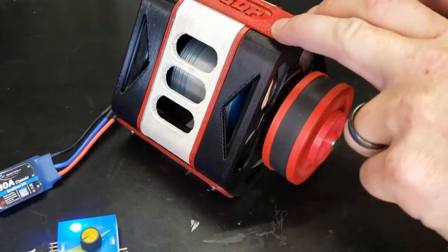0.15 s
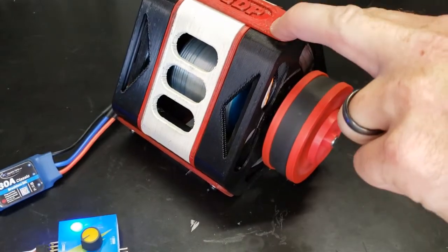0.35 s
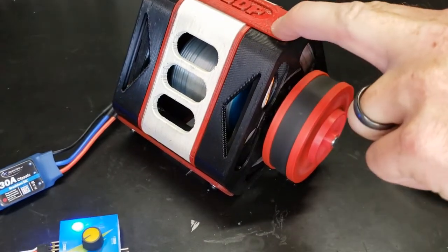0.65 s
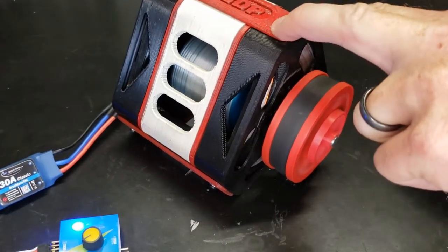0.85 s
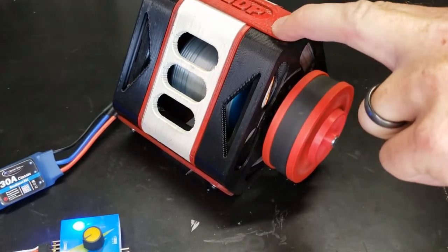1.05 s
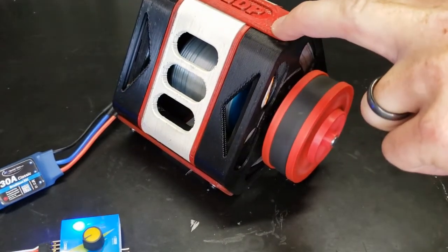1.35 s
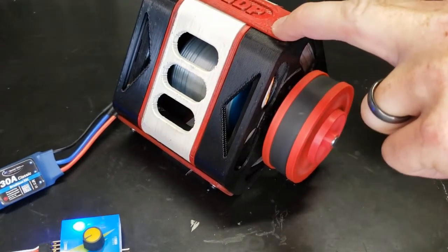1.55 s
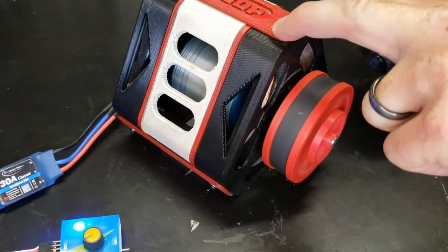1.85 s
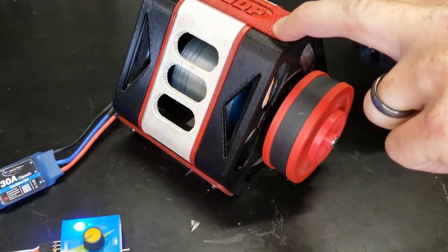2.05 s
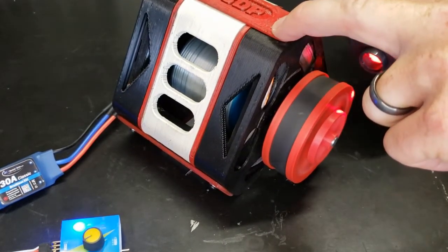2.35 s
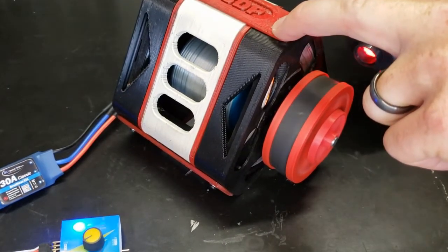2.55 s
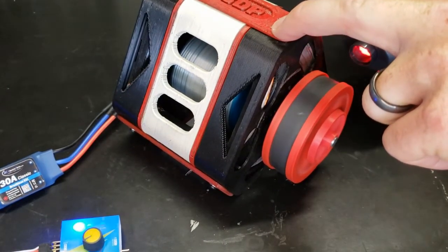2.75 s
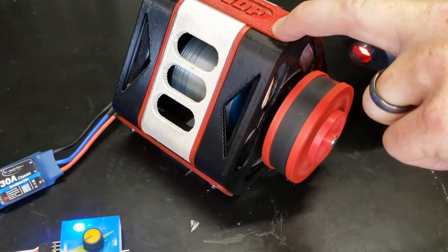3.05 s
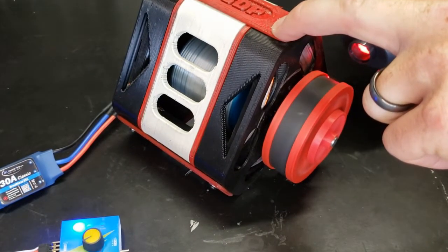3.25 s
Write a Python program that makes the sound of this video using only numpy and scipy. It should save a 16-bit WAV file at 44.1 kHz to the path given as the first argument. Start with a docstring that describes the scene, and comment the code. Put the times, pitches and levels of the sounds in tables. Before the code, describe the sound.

Close up on a workbench, a small electric motor drones at a nearly constant speed, buzzing and rattling in a plastic shell with a high hiss. A few soft bumps reach the microphone partway through as it keeps running.

```python
"""A small 3D-printed brushless motor on a workbench, held down by a finger, left of a stereo microphone.
From the start its unbalanced rotor hums and knocks in the plastic housing once a turn; after each knock
the loose shaft rattles and ticks at fixed angles. The bearings hiss and the housing rings faintly.
Three soft thumps reach the microphone around one second in, two more near 2 and 2.4 seconds.
The motor runs on to the end, very slowly gaining speed."""
import sys
import numpy as np
from scipy import signal
from scipy.fft import rfft, irfft
from scipy.io import wavfile
from scipy.ndimage import uniform_filter1d, map_coordinates

SR = 44100
rng = np.random.default_rng(int(sys.argv[2]) if len(sys.argv) > 2 else 0)


def dump(signal):
    """Clip the signal to [-1, 1] and save it as 16-bit WAV at the path in sys.argv[1]."""
    limited = np.clip(np.atleast_2d(signal).T, -1, 1)
    pcm = np.round(limited * 32767).astype(np.int16)
    wavfile.write(sys.argv[1], SR, pcm)


N = 149940

MEAN_HZ = 150.6  # typical turn rate
SPLIT_HZ, SIZZLE_HZ = 4960, 11400  # rattle gives way to ticks, ticks to sizzle
SHARED_LOW, SHARED_HIGH = 0.8, 0.54  # share of noise power common to both sides, below and above SPLIT_HZ
# Tone of the shaft and bearings at the microphone. Each row: frequency in Hz, left and right gain in dB.
NOISE_TONE = [(20, -45, -55), (60, -46.5, -48), (110, -31, -37.5), (160, -29, -28), (231, -38.5, -44),
              (550, -37, -42), (655, -37.5, -46), (740, -32, -35), (1060, -40, -28), (1300, -32, -34),
              (1750, -32, -37), (2270, -26.5, -34.5), (2700, -28, -33), (3400, -28, -29.5),
              (4100, -29, -37), (4600, -38, -39), (6200, -38, -40), (7000, -32, -38), (7700, -38, -33),
              (8800, -32, -38), (10500, -34, -40), (13200, -31, -34), (15700, -32, -32.5)]
# Contacts of the loose shaft. Each row: turns after the knock, timing spread in turns,
# relative rattle level in dB, relative tick level in dB.
SHAFT_CONTACTS = [(.045, 0.0086, -20, -11), (0.113, 0.0065, -21.5, -14), (0.296, 0.0111, -8, -3),
                  (0.379, 0.024, -14.5, -18.5), (0.722, 0.018, -5.5, -17.5)]


def undb(db):
    return 10 ** (np.asarray(db) / 20)


def unit(x):
    """Scale to rms 1."""
    return x / np.sqrt(np.mean(x ** 2))


def curve(points):
    """Straight lines through (seconds, value) points."""
    return np.interp(np.arange(N) / SR, *np.array(points).T)


def walk(rate_hz):
    """Random levels held 1 / rate_hz seconds and smoothed twice; rms 1."""
    hold = int(SR / rate_hz)
    steps = np.repeat(rng.standard_normal(N // hold + 1), hold)
    return unit(uniform_filter1d(uniform_filter1d(steps, hold), hold)[:N])


def colour(x, hz, db, size=4096):
    """Causal filter with the given response."""
    gain = undb(np.interp(np.arange(size // 2 + 1) * SR / size, hz, db))
    cepstrum = irfft(np.log(gain))
    cepstrum[1:size // 2] *= 2
    cepstrum[size // 2 + 1:] = 0
    return signal.fftconvolve(x, irfft(np.exp(rfft(cepstrum))))[:N]


def colour_noise(pair):
    """Give each side the tone that shaft and bearings share."""
    hz, *sides = np.array(NOISE_TONE).T
    per_khz = np.sqrt(SR / 2000)  # brings white noise of rms 1 to power 1 per kHz
    return np.array([colour(per_khz * x, hz, db) for x, db in zip(pair, sides)])


def clicks(times, sizes, order=8):
    """Band-limited impulses at exact times."""
    at = times[:, None] * SR
    index = np.floor(at).astype(int) + np.arange(1 - order, order + 1)
    shape = np.sinc(index - at) * np.sinc((index - at) / order) * sizes[:, None]
    inside = (index >= 0) & (index < N)
    return np.bincount(index[inside], shape[inside], N)


def split(x, hz, kind):
    """A low, high or middle part of the spectrum."""
    return signal.sosfilt(signal.butter(4, hz, kind, fs=SR, output="sos"), x)


def noise_pair(shared):
    """Left and right noise with a share in common."""
    return np.sqrt(shared) * rng.standard_normal(N) + np.sqrt(1 - shared) * rng.standard_normal((2, N))


def lag_right(pair, lag_s=8e-5):
    """The motor stands to the left, so the right side hears it slightly later."""
    right = map_coordinates(pair[1], [np.arange(N) - lag_s * SR], order=5, mode="mirror")
    return np.array([pair[0], right])


def passes(turns, angle):
    """Times in seconds at which the rotor passes an angle, given in turns."""
    return np.interp(np.arange(int(turns[-1])) + angle, turns, np.arange(N) / SR)


def thumps(t, hz=52.4, rise_s=0.0061, right_db=-16):
    """Soft low bumps of a cycle or two, mostly on the left of the microphone."""
    # The bumps. Each row: start in seconds, level in dB.
    bumps = [(.935, -30), (0.963, -28), (1.028, -21), (1.975, -36), (2.382, -30)]
    out = 0
    for start, db in bumps:
        age = np.maximum(t - start, 0)
        envelope = age / rise_s * np.exp(1 - age / rise_s)
        out += undb(db) * envelope * np.sin(2 * np.pi * hz * age)
    return out * undb([[0], [right_db]])


def housing():
    """Narrow modes of the plastic shell, kept ringing while the motor runs."""
    # Shell modes. Each row: frequency in Hz, width in Hz, left and right level in dB.
    modes = [(1529, 5.3, -49, -53), (1995, 7.8, -47, -34), (3508, 20, -37.5, -51.5), (8090, 80, -46.5, -36)]
    out = 0
    for hz, width, left_db, right_db in modes:
        pole = np.exp((2j * hz - width) * np.pi / SR)
        ring = signal.lfilter([1], [1, -pole], rng.standard_normal(N)).imag
        out += undb([[left_db], [right_db]]) * unit(ring)
    return out


def bearings(turns, depth=0.48, peak_turn=0.64, flicker_db=0.93):
    """The bearings give a low rush and a high hiss that swell once a turn and flicker."""
    swell = 1 + depth * np.cos(2 * np.pi * (turns - peak_turn))
    swell *= undb(flicker_db * walk(29.5))
    rush = undb(-6.5) * swell * noise_pair(SHARED_LOW)
    hiss = undb(-5.5) * swell * noise_pair(SHARED_HIGH)
    return colour_noise(lag_right(split(rush, SPLIT_HZ, "low")) + split(hiss, SPLIT_HZ, "high"))


def even_tick(turns, angle=0.31, scatter_db=3.5):
    """One light contact keeps exact time, once a turn, and adds a thin high whine."""
    # Tone of this contact. Each row: frequency in Hz, left and right level in dB.
    tone = [(6500, -75, -75), (7800, -58, -58), (8200, -42, -43), (9300, -49, -56), (10600, -43, -55),
            (11600, -42, -55), (12600, -46, -54), (13800, -44, -52), (15700, -50, -52)]
    times = passes(turns, angle)
    sizes = undb(scatter_db * rng.standard_normal(len(times)))
    ticks = clicks(times, sizes) * SR / (2 * MEAN_HZ)
    hz, *sides = np.array(tone).T
    return np.array([colour(ticks, hz, db) for db in sides])


def strikes(turns, contact_db, level_points, shared, scatter_db, wander_db, wander_hz=45.05):
    """The shaft strikes unevenly at fixed angles; returns the clicks and their brief scrapes."""
    drift_db = curve(level_points) + wander_db * walk(wander_hz)
    hits = np.zeros(N)
    for (angle, spread, *_), db in zip(SHAFT_CONTACTS, contact_db):
        times = passes(turns, angle)
        timing, strength = rng.standard_normal((len(times), 2)).T
        sizes = undb(db + scatter_db * np.minimum(strength, 2))
        hits += clicks(times + spread / MEAN_HZ * timing, sizes)
    hits *= undb(drift_db)
    scrape_s = 0.0012
    energy = signal.lfilter([1], [1, -np.exp(-2 / (scrape_s * SR))], hits ** 2 + 1e-18)
    return hits, np.sqrt(energy) * noise_pair(shared)


def loose_shaft(turns):
    """The contacts of the loose shaft make a dull rattle, bright ticks and a top sizzle."""
    # How hard the shaft rattles. Each row: time in seconds, relative level in dB.
    rattle_level = [(0, -1), (.35, -1.5), (.45, 1.5), (.6, -2.5), (.73, -1), (.9, -1.5), (1.0, -1),
                    (1.35, -0.5), (1.55, 1.1), (1.95, -3.5), (2.07, 1.3), (2.2, -2), (2.28, -3.5),
                    (2.4, -2.5), (2.68, -1.5), (2.88, 1), (2.95, 4.5), (3.03, -3.5), (3.13, 1), (3.19, -3),
                    (3.26, .7), (3.4, 1)]
    # How hard it ticks and sizzles. Each row: time in seconds, relative level in dB.
    tick_level = [(0, -0.5), (.35, 2.2), (.45, 3), (.65, -0.8), (.96, -2), (1.1, 1), (1.2, 0.5), (1.5, -.8),
                  (1.9, 0), (2.2, .3), (2.55, 0.3), (2.76, 2.5), (3.1, 1), (3.4, -0.5)]
    _, _, rattle_db, tick_db = np.array(SHAFT_CONTACTS).T
    _, scrape = strikes(turns, rattle_db, rattle_level, SHARED_LOW,
                        scatter_db=2.8, wander_db=1.5, wander_hz=45.43)
    rattle = undb(-3) * split(unit(scrape), SPLIT_HZ, "low")
    hits, scrape = strikes(turns, tick_db, tick_level, SHARED_HIGH, scatter_db=2.3, wander_db=1.0)
    scraped_hits = unit(unit(hits) + undb(-3) * unit(scrape))
    ticks = undb(-6) * split(scraped_hits, [SPLIT_HZ, SIZZLE_HZ], "band")
    _, scrape = strikes(turns, tick_db, tick_level, SHARED_HIGH, scatter_db=1.3, wander_db=0.8)
    sizzle = undb(-4) * split(unit(scrape), SIZZLE_HZ, "high")
    return colour_noise(lag_right(rattle) + ticks + sizzle)


def wall_delay(x):
    """Each wall resonance holds back the frequencies near it, smearing the knock."""
    # Wall resonances. Each row: frequency in Hz, width in Hz.
    resonances = [(530, 100), (720, 210), (1950, 140)]
    for hz, width in resonances:
        radius = np.exp(-np.pi * width / SR)
        poles = np.array([1, -2 * radius * np.cos(2 * np.pi * hz / SR), radius ** 2])
        x = signal.lfilter(poles[::-1], poles, x)  # all-pass
    return x


def rotor(turns, jitter_s=4e-6, scatter_db=0.45, wander_db=0.8, hum_turn=0.66):
    """The unbalance hums and drives one nearly even knock a turn into the housing."""
    # Overtones of the knock, from twice the turn rate upwards. Each row: left and right level in dB.
    overtones = [(-27, -35), (-31.5, -40.5), (-30, -37.5), (-29.5, -44.5), (-30, -30.5), (-23.5, -30.5),
                 (-27.5, -31), (-32, -56.5), (-25, -30.5), (-25.5, -63), (-54.5, -27.5), (-47.5, -44),
                 (-23.5, -26.5), (-25, -43.5), (-28.5, -34), (-26.5, -27.5), (-28.5, -37), (-24, -33),
                 (-40, -31.5), (-29.5, -29), (-27.5, -44), (-33.5, -39.5), (-23.5, -44), (-39.5, -33.5),
                 (-34.5, -51), (-20.5, -72), (-39.5, -37), (-45, -41), (-35.5, -35), (-52.5, -56),
                 (-38, -55), (-61, -38), (-43, -60), (-32.5, -55), (-44, -51), (-52, -43), (-32, -49),
                 (-31, -58), (-48, -32), (-58, -56), (-50, -37), (-42, -51), (-49, -42), (-37, -44),
                 (-27.5, -68), (-39, -58), (-41, -59), (-30.5, -33), (-59, -58)]
    # How hard the rotor knocks. Each row: time in seconds, relative level in dB.
    knock_level = [(0, 0.4), (.8, 0), (1.3, 0), (1.8, -.5), (2.3, -.5), (2.7, 0), (3.4, 0.6)]
    times = passes(turns, 0)
    timing, strength = rng.standard_normal((len(times), 2)).T
    knocks = clicks(times + jitter_s * timing, undb(-0.5 + scatter_db * strength))
    knocks *= SR / (2 * MEAN_HZ)  # brings each harmonic near amplitude 1
    knocks = wall_delay(knocks * undb(curve(knock_level) + wander_db * walk(35.16)))
    hz = MEAN_HZ * np.arange(1, len(overtones) + 3)
    fundamental_db, top_db = -45, -61
    body = np.array([colour(-knocks, hz, np.r_[fundamental_db, db, top_db])
                     for db in np.array(overtones).T])
    hum = undb([[-18.5], [-24.5]]) * np.cos(2 * np.pi * (turns - hum_turn))  # left, right
    return lag_right(body - body.mean(axis=1, keepdims=True)) + hum


def scene():
    """The turn rate creeps up ever more slowly; hum, knocks, contacts and hiss follow the rotor angle."""
    # Brief dips of the hum and knock. Each row: centre in seconds, level change in dB.
    dips = [(.335, -4.5), (.445, -1.8), (1.375, -3), (1.62, -2.5), (2.006, -4.5), (2.67, -3), (2.728, -3),
            (2.84, -3.5), (3.16, -1.8), (3.31, -2)]
    dip_s = 0.0091
    start_hz, gain_hz_per_s, ease_hz_per_s2 = 149.32, 0.985, 0.083
    t = np.arange(N) / SR
    turn_hz = start_hz + gain_hz_per_s * t - ease_hz_per_s2 * t ** 2
    turns = np.cumsum(turn_hz) / SR - 0.27
    dips_db = sum(db * np.exp(-((t - at) / dip_s) ** 2) for at, db in dips)
    motor = undb(dips_db) * rotor(turns) + bearings(turns) + loose_shaft(turns) + even_tick(turns)
    return motor + housing() + thumps(t)


def record(dry, low_cut_hz=53, ceiling=0.95, top_hz=15750):
    """The recorder drops the deepest rumble, rounds the highest peaks and cuts the top steeply."""
    x = signal.sosfilt(signal.butter(2, low_cut_hz, "high", fs=SR, output="sos"), dry)
    x = x / (1 + (x / ceiling) ** 8) ** (1 / 8)
    return signal.sosfilt(signal.ellip(12, .2, 80, top_hz, fs=SR, output="sos"), x)


dry = scene()
out = record(dry)
dump(out)
```